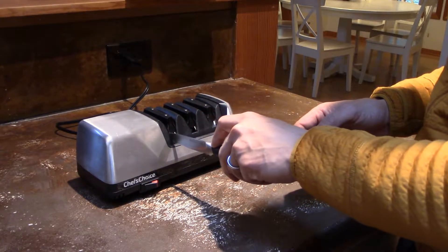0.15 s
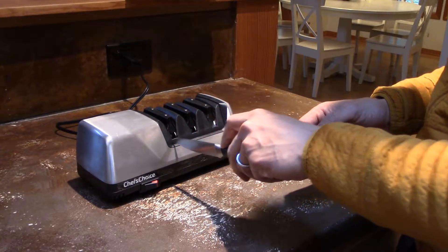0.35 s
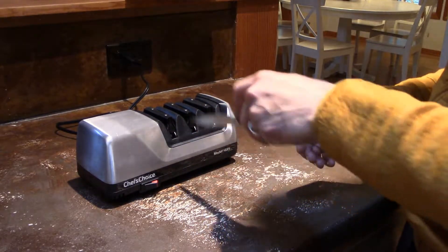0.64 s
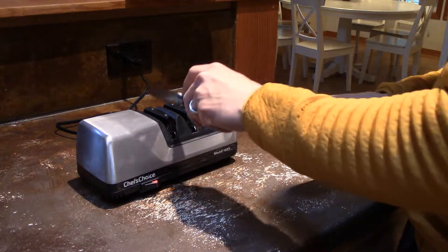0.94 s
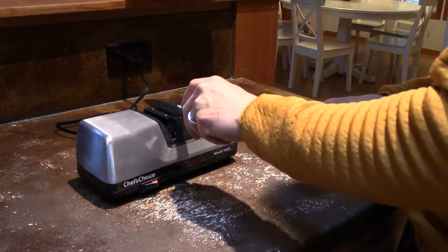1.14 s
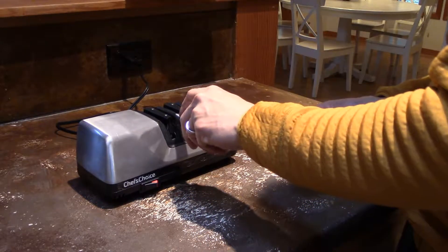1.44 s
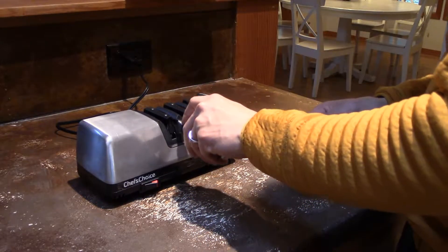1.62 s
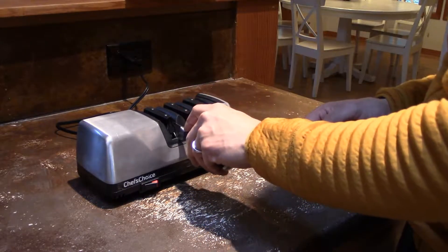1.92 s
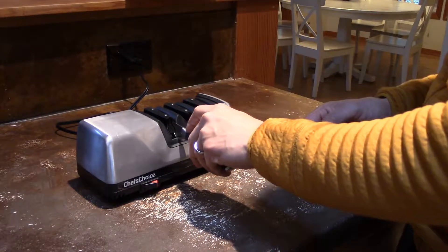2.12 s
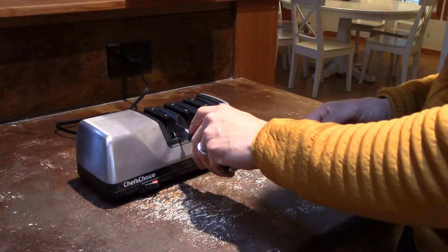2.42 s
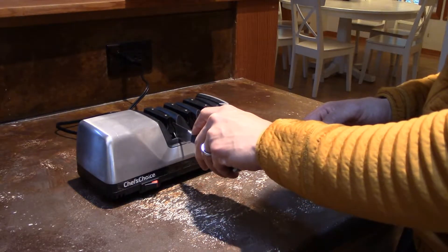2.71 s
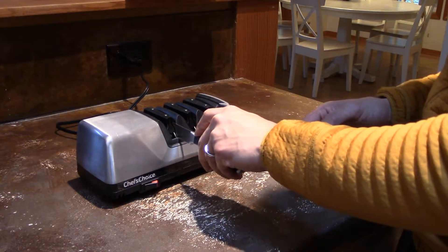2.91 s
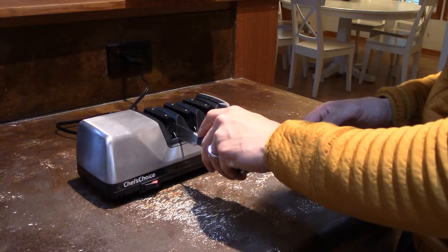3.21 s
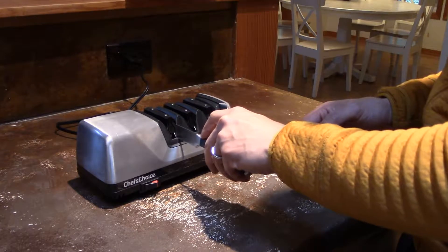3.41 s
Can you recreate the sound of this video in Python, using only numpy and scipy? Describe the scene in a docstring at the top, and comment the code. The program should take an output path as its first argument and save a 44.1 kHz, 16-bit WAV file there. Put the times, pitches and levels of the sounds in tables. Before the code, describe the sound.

A knife rasps and hisses in an electric sharpener, close by, its tip chattering off with a clunk and ping at about 0.4 seconds. The motor hums quietly, with a few faint knocks around 1.2 seconds. At 1.7 seconds the blade clicks back in and grinds until the end, around 3.6 seconds, buzzing and pulsing as metallic ringing notes swell and fade. The kitchen adds a slight echo.

```python
"""A steel blade rasps and hisses against the spinning wheel of an electric knife sharpener in a kitchen.
The same grit passes the edge on every turn, so the rasp buzzes and the hiss pulses, while ringing notes
in the blade swell and fade as the contact point moves. The first pull ends with the tip chattering
off the wheel. The motor hums on, with a few faint knocks, until the blade is set back in the slot
for a second, longer pull."""
import sys
import numpy as np
from scipy import signal
from scipy.fft import rfft, irfft, next_fast_len
from scipy.io import wavfile
from scipy.ndimage import map_coordinates

SR = 44100
rng = np.random.default_rng(int(sys.argv[2]) if len(sys.argv) > 2 else 0)


def transcribe(u):
    """Save the signal u as a 16-bit wav file named by the first command-line argument.

    u: samples, shape (n,) or (channels, n), limited to [-1, 1]; the rate is SR.
    q: integer samples, one column per channel.
    """
    v = np.clip(np.atleast_2d(u).T, -1, 1)
    q = np.round(v * 32767).astype(np.int16)
    wavfile.write(sys.argv[1], SR, q)


N = 156555
T = np.arange(N) / SR

# How long the kitchen's echo takes to fade by 60 dB: pitch_hz, fade_s
ECHO_FADE = [(300, 0.3), (1500, 0.43), (5000, 0.39), (10000, 0.4), (15000, 0.18)]
# The echo is weaker in the treble: pitch_hz, gain_db
ECHO_TILT = [(4000, 0.012), (12000, -8.5)]
# Steady tones of the motor: pitch_hz, level_db
HUM_TONES = [(120, -59), (176, -65), (241, -67.5), (373, -62), (457, -57.5), (590, -64.5)]
# A "colour" says how strong a noise is at each pitch, compared with its other pitches.
# Colours of the whirring wheels, a knock and the housing's clunk: pitch_hz, level_db
WHIRR_COLOUR = [(12, -6), (20, 1), (90, -9.5), (123, 0.5), (145, -15), (246, -10.5), (268, -19), (364, -7),
                (455, -10), (494, -5.5), (965, -15.5), (8040, -19.5), (15700, -25)]
KNOCK_COLOUR = [(150, -9), (600, 1.5), (1600, 0.5), (3800, 5), (15000, 7)]
CLUNK_COLOUR = [(150, -38), (380, -19), (580, -0.5), (850, 0.5), (1400, -0.5), (2200, -14)]
# The blade knocks on its guide: start_s, level_db, decay_s, treble_limit_hz
GUIDE_KNOCKS = [(0.3849, -8.5, 0.0031, 6000), (1.121, -43.5, 0.0071, 4000), (1.277, -41, 0.0041, 11000),
                (1.291, -47, 0.0033, 9000), (1.7063, -21.5, 0.0051, 15100), (2.857, -29, 0.0017, 3500),
                (3.157, -35, 0.0024, 3500), (3.213, -30, 0.0025, 3420)]
# The tip bounces on the wheel: start_s, level_db
TIP_BOUNCES = [(0.32, -14.5), (0.328, -9), (0.3371, -13), (0.344, -15.5), (0.366, -11.5), (0.3814, -15.5)]

# Names ending in _1 and _2 belong to the first and second pull.
# Timing of a pull and of one peak of its throb: start_s, end_s, crest_s
TIMING_1, TIMING_2 = (-0.1, 0.39, 0.0035), (1.72, 3.7, 1.985)
# Tones of the motor under load: pitch_hz, level_db, lag_after_crest_s
DRONE_1 = [(552, -50.5, 0.002), (503, -53.5, 0.027)]
DRONE_2 = [(524.5, -50, 0.02), (466.4, -52.5, 0.042)]
# Colours of the shaking housing, the rasp and the hiss: pitch_hz, level_db
HOUSING_COLOUR_1 = [(200, -21), (430, -12), (510, -2), (600, -1.5), (720, -11.5), (900, -9.5)]
HOUSING_COLOUR_2 = [(200, -9.5), (410, -11.5), (500, 6.5), (570, -3.5), (900, -7)]
RASP_COLOUR_1 = [(470, -49), (1100, -8), (1650, -9), (1810, -20.5), (2200, 2.5), (2440, -12), (2780, 2),
                 (3040, -3.5), (3540, 6), (3950, -2), (4830, 7.5), (5300, 11.5), (7000, -15.5), (9100, -10)]
RASP_COLOUR_2 = [(500, -33.5), (959, -11.5), (1220, -10), (1890, -18), (2100, -9.5), (2500, -2.5),
                 (3000, 4), (3350, 8.5), (3700, -0.5), (4100, 10), (4700, 12), (5200, 11), (6570, -11.5),
                 (9100, -22)]
HISS_COLOUR_1 = [(4120, -36), (7000, 0), (7220, -14), (7850, 1.5), (8520, -14), (9360, 9), (10400, -1),
                 (11100, 1.5), (12800, -2.5), (13900, -0.5), (15700, -14)]
HISS_COLOUR_2 = [(4120, -23), (7000, -5), (7720, -5), (8660, 0.5), (12900, -1.5), (15700, -14)]
# How the grinding rises and falls, before the boosts below: time_s, rasp_db, hiss_db
LOUDNESS_1 = [(0.0, -29, -30), (0.13, -29, -26.5), (0.21, -28.5, -30.5), (0.3, -23.5, -30),
              (0.36, -24, -31)]
LOUDNESS_2 = [(1.72, -37, -26), (1.768, -33.5, -30), (2.08, -32, -26.5), (2.281, -32.5, -30.5),
              (2.62, -31, -33), (2.85, -32, -26.5), (3.102, -32.5, -35), (3.55, -32.5, -35)]
# High spots on the wheel: place_turns, width_turns, rasp_boost_db, hiss_boost_db
HIGH_SPOTS_1 = [(0.28, 0.023, 6, 11), (0.42, 0.14, 12.5, 0.5), (0.86, 0.13, 7.5, 5)]
HIGH_SPOTS_2 = [(0.36, 0.028, 5.3, 5.5), (0.49, 0.052, 2, 5.2), (0.71, 0.06, 1.5, 8),
                (0.799, 0.018, 11.5, 1.36)]
# The blade rings as the contact passes: middle_s, half_length_s, pitch_hz, glide_hz_per_s,
# width_hz, level_db
BLADE_RINGS = [(0.01, 0.053, 8050, 0, 300, -29), (0.106, 0.056, 11160, 2, 620, -27),
               (0.31, 0.036, 13700, 0, 550, -25), (1.784, 0.3, 3500, 0, 500, -36.5),
               (1.871, 0.092, 8900, 1495.5, 615, -24), (1.947, 0.15, 15300, 44, 806, -32),
               (2.27, 0.22, 4330, 0, 232, -35.5), (2.564, 0.17, 7820, 900, 207, -30),
               (2.86, 0.12, 6370, 0, 390, -29.5), (2.9, 0.14, 10200, 1500, 1170, -22),
               (3.153, 0.15, 3360, 1800, 397, -30), (3.203, 0.16, 10520, -9, 1280, -18.5),
               (3.442, 0.05, 4140, 2508, 274, -40.5), (3.51, 0.13, 9600, -4000, 910, -21)]
# Purer notes of the blade that sing in turn: middle_s, half_length_s, pitch_hz, level_db
BLADE_NOTES = [(2.35, 0.21, 3178, -37.5), (2.86, 0.14, 2960, -35), (2.92, 0.15, 3323, -34),
               (3.44, 0.097, 4410, -40), (3.54, 0.046, 4830, -39)]

WHEEL_HZ, MAINS_BUZZ_HZ, THROB_HZ = 55.6, 120, 8.83
RASP_BOOST_DB, HISS_BOOST_DB = 0.5, 6.5
RASP_FRESH, HISS_FRESH, HOUSING_FRESH = 0.32, 0.72, 0.87  # share of the grit noise that never repeats


def from_db(db):
    """Turn decibels into a number to multiply by."""
    return 10 ** (np.asarray(db) / 20)


def unit_power(x):
    """Scale a sound so that its average power is 1."""
    return x / np.sqrt(np.mean(x ** 2) + 1e-20)


def at_hz(table, hz):
    """Read between the rows of a table, with pitch spaced in octaves."""
    pitches, values = np.transpose(table)
    return np.interp(np.log(np.maximum(hz, 1)), np.log(pitches), values)


def drift(hz):
    """A smooth random wobble of typical size 1 that changes hz times a second."""
    times = T[::16]
    curve = map_coordinates(rng.standard_normal(N // 32), [times * hz + 2], order=2, mode="wrap")
    return unit_power(np.interp(T, times, curve))


def colour(x, table):
    """Give a sound the table's colour and a power of 1; pitches beyond the table fall away steeply."""
    size = next_fast_len(N + SR // 4, real=True) * 2
    hz = np.maximum(np.arange(size // 2 + 1) * SR / size, 1)
    octaves_outside = np.abs(np.log2(hz / np.clip(hz, table[0][0], table[-1][0])))
    gain = from_db(at_hz(table, hz) - np.minimum(60 * octaves_outside, 50))
    # Build the filter so that it never rings before the sound arrives.
    cepstrum = irfft(np.log(gain))
    response = np.exp(2 * rfft(cepstrum[:size // 2], size))
    return unit_power(irfft(rfft(x, size) * response)[:N])


def lowpass(x, hz, order):
    """Soften everything above hz; a higher order cuts more steeply."""
    return signal.sosfilt(signal.butter(order, hz, fs=SR, output="sos"), x)


def struck(start_s, decay_s):
    """The loudness of something hit: a sudden start, then dying away."""
    return (T >= start_s) * np.exp(-np.maximum(T - start_s, 0) / decay_s)


def grains(size):
    """Rough noise from grains of uneven size."""
    return unit_power(rng.standard_normal(size) * from_db(4.5 * rng.standard_normal(size)))


def kitchen_echo(x):
    """The room returns a blur of echoes, weaker and shorter in the treble."""
    t = T[:SR * 2 // 3]
    edges = np.geomspace(100, 17000, 10)
    build_up = np.clip(t / 0.0096 - .5, 0, 1)
    tail = 0
    for low, high in zip(edges, edges[1:]):
        hz = np.sqrt(low * high)
        bandpass = signal.butter(2, [low, high], "band", fs=SR, output="sos")
        band = signal.sosfilt(bandpass, rng.standard_normal(len(t)))
        fade = np.exp(-np.log(1000) * t / at_hz(ECHO_FADE, hz)) * build_up
        tail += band * fade / np.linalg.norm(fade) * from_db(-10 + at_hz(ECHO_TILT, hz))
    return signal.fftconvolve(x, tail)[:N]


def motor():
    """The motor's wavering hum over the soft whirr of the spinning wheels."""
    hum = 0
    for hz, db in HUM_TONES:
        peak = np.sqrt(2) * from_db(db - 0.5 * drift(16))
        hum += peak * np.sin(2 * np.pi * hz * T + .5 * drift(7.19))
    whirr = from_db(-48 + 0.5 * drift(76)) * colour(rng.standard_normal(N), WHIRR_COLOUR)
    return hum + whirr


def throb(crest_s):
    """The beat, from -1 to 1, of the motor slipping behind the mains supply."""
    return np.cos(2 * np.pi * THROB_HZ * (T - crest_s))


def motor_drone(tones, crest_s):
    """Under load, the motor's tones swell one after the other on each beat."""
    out = 0
    for hz, db, lag_s in tones:
        swell = 1 + 0.53 * throb(crest_s + lag_s)
        out += np.sqrt(2) * from_db(db) * swell * np.sin(2 * np.pi * hz * T + .5 * drift(10))
    return out


def housing_shake(table, db, crest_s):
    """The housing passes on the grinding as a low noise that throbs with the motor."""
    return from_db(db) * (1 + 0.25 * throb(crest_s)) * colour(grit(HOUSING_FRESH), table)


def guide_knocks():
    """The blade knocks on its guide, each time with a short burst of noise."""
    noise = colour(rng.standard_normal(N), KNOCK_COLOUR)
    return sum(from_db(db) * struck(start_s, decay_s) * unit_power(lowpass(noise, hz, order=2))
               for start_s, db, decay_s, hz in GUIDE_KNOCKS)


def blade_release(rock_s=0.326, free_s=0.384, thud_hz=131, ping_hz=5330):
    """The machine rocks on the table, then the housing springs back and the freed blade pings."""
    thud = from_db(-37) * struck(rock_s, 0.0062) * np.sin(2 * np.pi * thud_hz * (T - rock_s))
    clunk = from_db(-26) * struck(free_s, 0.024) * colour(rng.standard_normal(N), CLUNK_COLOUR)
    ping = from_db(-13) * struck(free_s, 0.004) * np.sin(2 * np.pi * ping_hz * (T - free_s))
    return thud + clunk + ping


def tip_chatter(rise_s=0.0018):
    """The wheel takes short bites at the tip as it skips off."""
    bites = sum(from_db(db) * np.exp(-np.minimum(((T - start_s) / rise_s - 1) ** 2, 50))
                for start_s, db in TIP_BOUNCES)
    hiss = colour(grains(N), HISS_COLOUR_1)
    rasp = from_db(-13.5) * colour(grains(N), RASP_COLOUR_1)
    return bites * (hiss + rasp)


def grit(fresh_share, grains_per_turn=793, renew_s=0.2988, wobble_s=0.000016):
    """The wheel's grit repeats each turn and slowly changes along the edge; a share is always new."""
    surfaces = grains((64, grains_per_turn))
    turns = (T + wobble_s * drift(30)) * WHEEL_HZ
    grain = (turns % 1 * grains_per_turn).astype(int)
    patch, blend = np.divmod(T / renew_s, 1)
    patch = patch.astype(int)
    leaving = surfaces[patch, grain] * np.cos(blend * np.pi / 2)
    arriving = surfaces[patch + 1, grain] * np.sin(blend * np.pi / 2)
    return np.sqrt(1 - fresh_share) * (leaving + arriving) + np.sqrt(fresh_share) * grains(N)


def wheel_pressure(high_spots):
    """The wheel's push for rasp and hiss: high spots, random judder and the motor's uneven pull."""
    rasp_db = hiss_db = 0
    for place, width, rasp_boost, hiss_boost in high_spots:
        turns_away = (T * WHEEL_HZ - place + .5) % 1 - .5
        bump = np.exp(-.5 * (turns_away / width) ** 2)
        rasp_db += rasp_boost * bump
        hiss_db += hiss_boost * bump
    ripple = 1 + 0.047 * np.cos(2 * np.pi * MAINS_BUZZ_HZ * T)
    judder_db = drift(252.6)
    return from_db(rasp_db + .5 * judder_db) * ripple, from_db(hiss_db + judder_db) * ripple


def blade_ring(scrape, middle_s, half_s, hz, glide, width_hz, db):
    """Scraping makes the blade ring near one pitch, which can glide as it swells and fades."""
    near = np.abs(T - middle_s) < 4 * half_s
    t = T[near] - middle_s
    pitch_hz = hz + glide * np.clip(t, -2 * half_s, 2 * half_s)
    spin = np.exp(2j * np.pi * np.cumsum(pitch_hz) / SR)
    # Shift that pitch down to zero, keep a narrow band, then shift it back up.
    band = lowpass(scrape[near] / spin, width_hz / 2, order=1)
    band = lowpass(band, width_hz * 0.91, order=1)
    out = np.zeros(N)
    out[near] = unit_power((band * spin).real) * from_db(db) * np.exp(-(t / half_s) ** 2 / 2)
    return out


def blade_ringing(rasp_force, hiss_force, start_s, end_s):
    """All the rings in one pull: the rasp drives the lower ones and the hiss the higher ones."""
    rasp, hiss = rasp_force * grit(RASP_FRESH), hiss_force * grit(HISS_FRESH)
    rings = sum(blade_ring(rasp if hz < 5000 else hiss, middle_s, half_s, hz, glide, width_hz, db)
                for middle_s, half_s, hz, glide, width_hz, db in BLADE_RINGS
                if start_s < middle_s < end_s)
    notes = sum(blade_ring(rasp, middle_s, half_s, hz, glide=0, width_hz=75, db=db)
                for middle_s, half_s, hz, db in BLADE_NOTES if start_s < middle_s < end_s)
    return rings + notes


def blade_shimmer(scrape, spacing_hz=370, swing_db=4):
    """The blade's many high notes each swell and fade as the contact slides: a metallic shimmer."""
    out = .6 * lowpass(scrape, 6300, order=3)
    for hz in np.arange(6600, 16000, spacing_hz):
        b, a = signal.iirpeak(hz + spacing_hz * rng.uniform(-.3, .3), Q=45, fs=SR)
        out += signal.lfilter(b, a, scrape) * from_db(swing_db * drift(7))
    return out


def knife_pull(timing, loudness, high_spots, rasp_colour, hiss_colour, housing, drone, housing_db):
    """Grit scrapes the steel, which rasps, hisses and rings while the housing and motor throb."""
    start_s, end_s, crest_s = timing
    times, rasp_db, hiss_db = np.transpose(loudness)
    rasp_gain = from_db(np.interp(T, times, rasp_db) + RASP_BOOST_DB + throb(crest_s))
    hiss_gain = from_db(np.interp(T, times, hiss_db) + HISS_BOOST_DB)
    rasp_force, hiss_force = wheel_pressure(high_spots)
    out = rasp_gain * colour(blade_shimmer(rasp_force * grit(RASP_FRESH)), rasp_colour)
    out += hiss_gain * colour(blade_shimmer(hiss_force * grit(HISS_FRESH)), hiss_colour)
    out += blade_ringing(rasp_force, hiss_force, start_s, end_s)
    out += housing_shake(housing, housing_db, crest_s)
    out += motor_drone(drone, crest_s)
    fade_in = np.clip((T - start_s) / 0.006, 0, 1)
    fade_out = np.clip((end_s - T) / 0.02, 0, 1) ** .5
    return out * fade_in * fade_out


def scene():
    """Two pulls, the chatter and the knocks echo in the kitchen over the running motor."""
    knife = knife_pull(TIMING_1, LOUDNESS_1, HIGH_SPOTS_1, RASP_COLOUR_1, HISS_COLOUR_1,
                       HOUSING_COLOUR_1, DRONE_1, housing_db=-41.5)
    knife += knife_pull(TIMING_2, LOUDNESS_2, HIGH_SPOTS_2, RASP_COLOUR_2, HISS_COLOUR_2,
                        HOUSING_COLOUR_2, DRONE_2, housing_db=-48.5)
    knife += tip_chatter() + guide_knocks() + blade_release()
    return (knife + kitchen_echo(knife) + motor())[None]


def record(dry):
    """Round off the loudest peaks and cut the very highest treble."""
    rounded = 0.9 * np.tanh(dry / 0.8)
    treble_cut = signal.firwin(401, cutoff=15850, window=("kaiser", 8), fs=SR)
    return signal.fftconvolve(rounded, treble_cut[None], mode="same")


dry = scene()
out = record(dry)
transcribe(out)
```